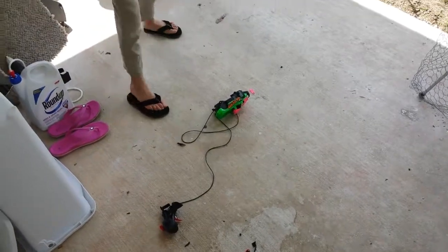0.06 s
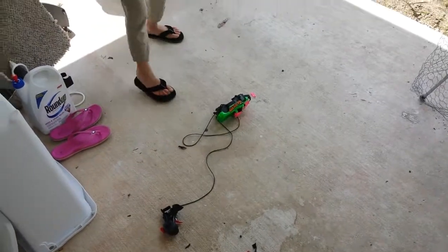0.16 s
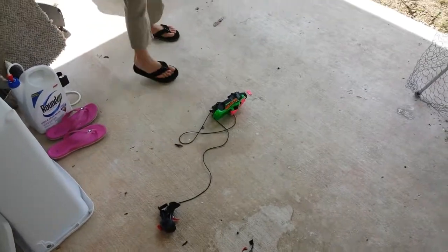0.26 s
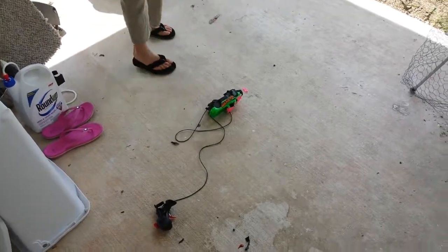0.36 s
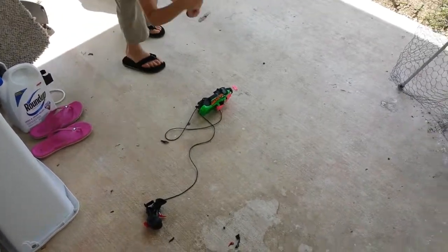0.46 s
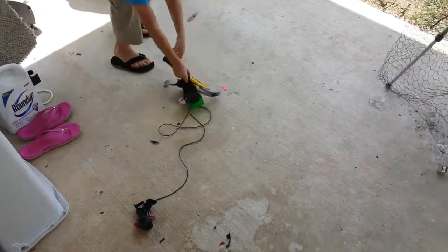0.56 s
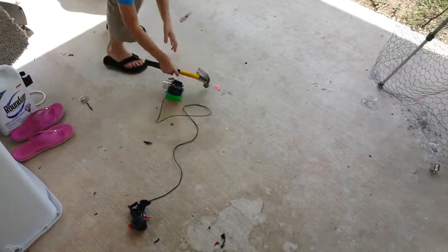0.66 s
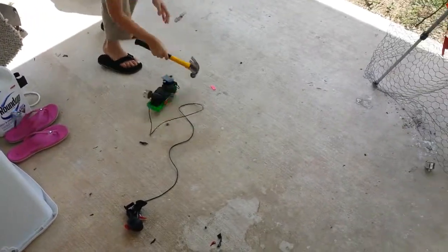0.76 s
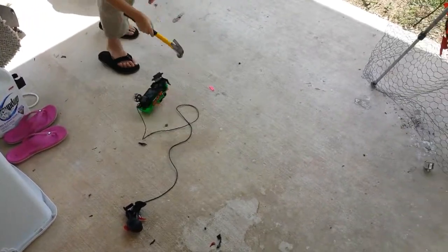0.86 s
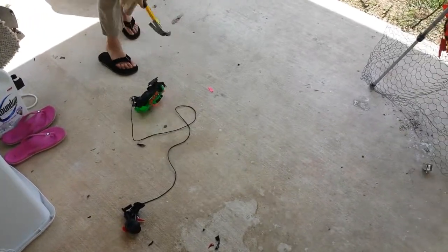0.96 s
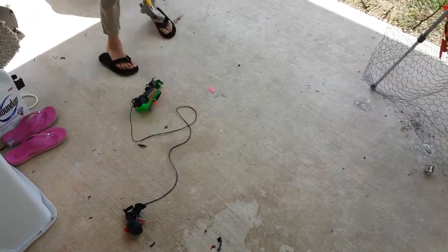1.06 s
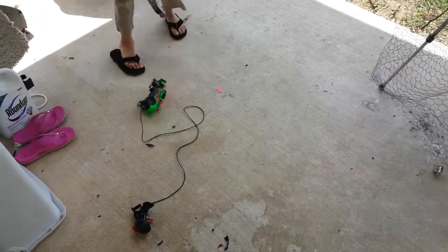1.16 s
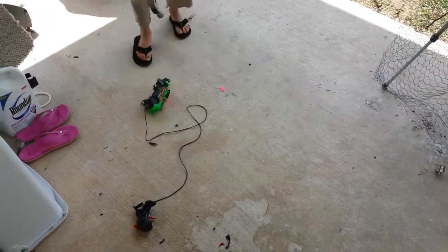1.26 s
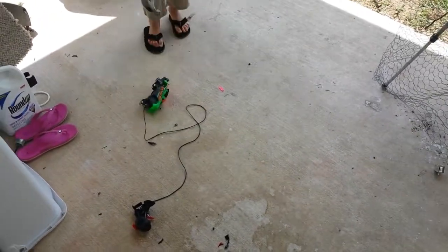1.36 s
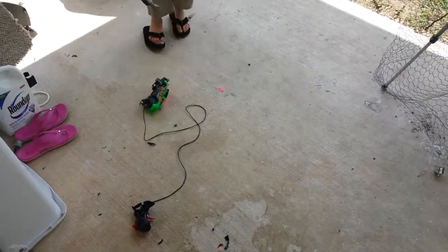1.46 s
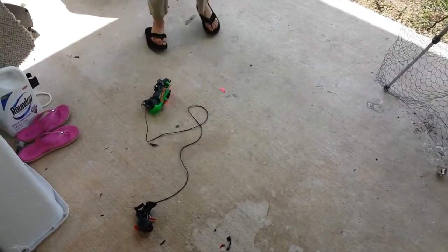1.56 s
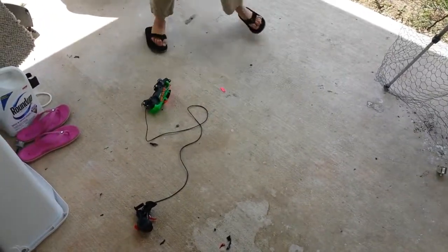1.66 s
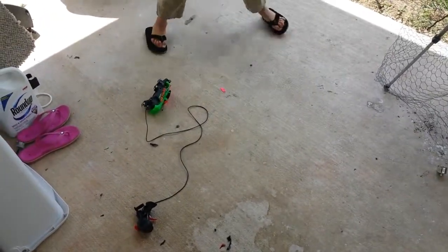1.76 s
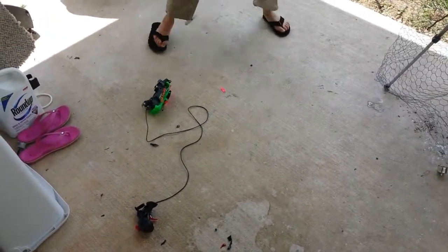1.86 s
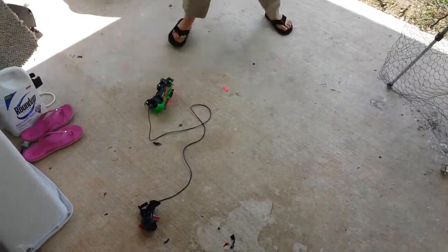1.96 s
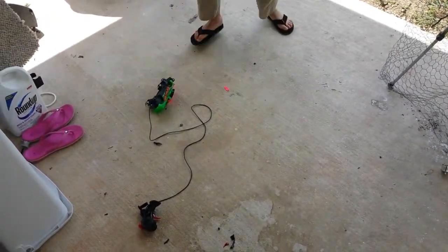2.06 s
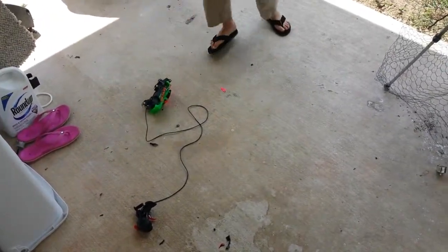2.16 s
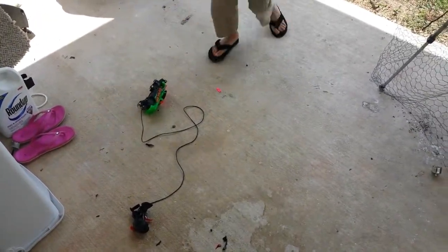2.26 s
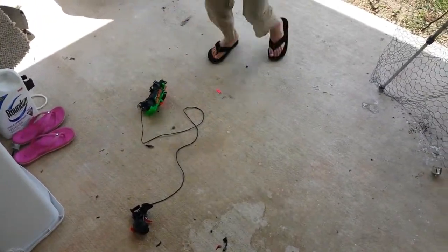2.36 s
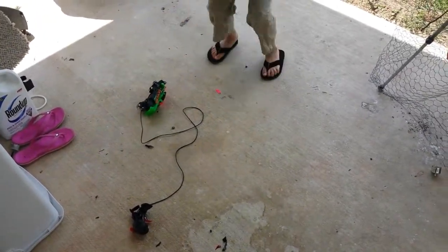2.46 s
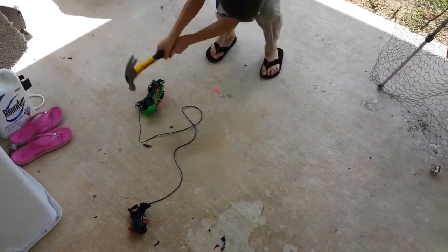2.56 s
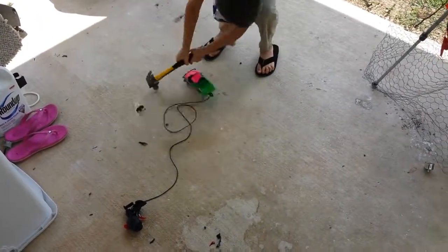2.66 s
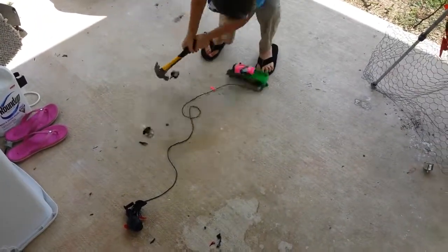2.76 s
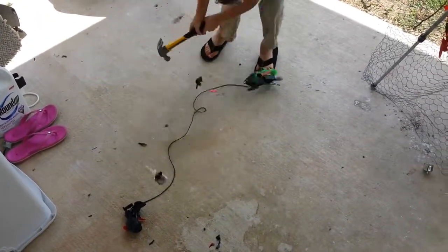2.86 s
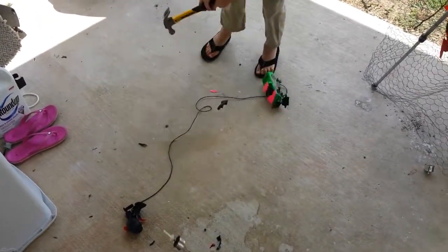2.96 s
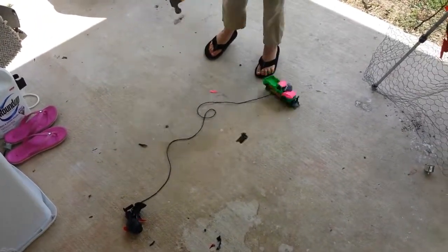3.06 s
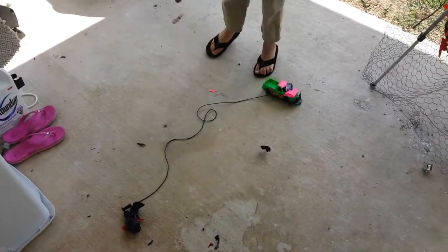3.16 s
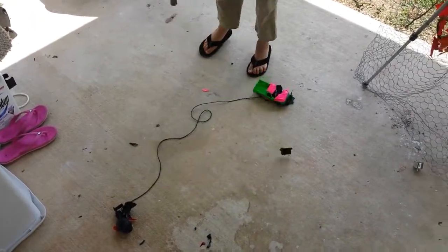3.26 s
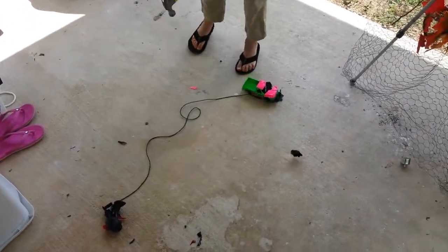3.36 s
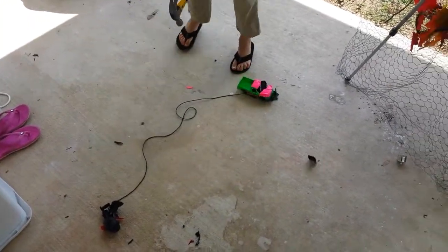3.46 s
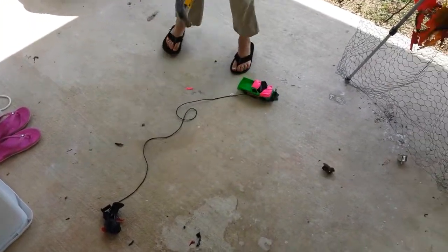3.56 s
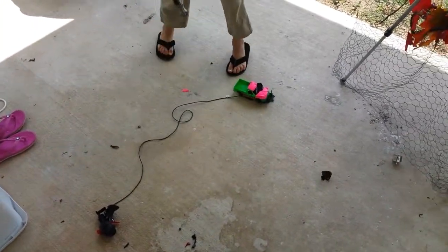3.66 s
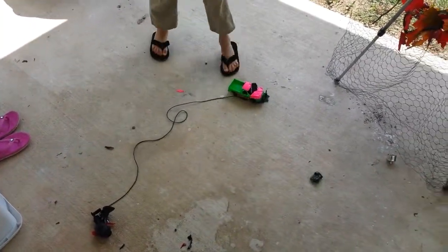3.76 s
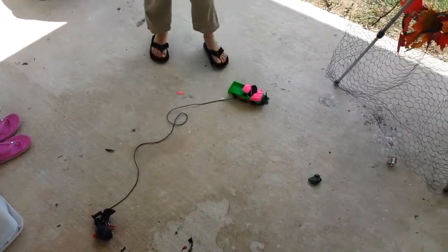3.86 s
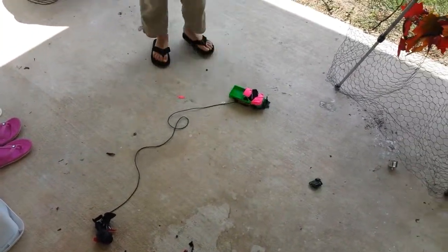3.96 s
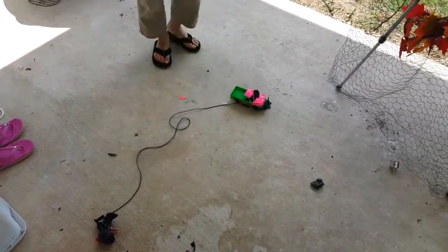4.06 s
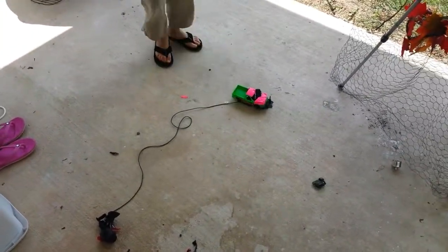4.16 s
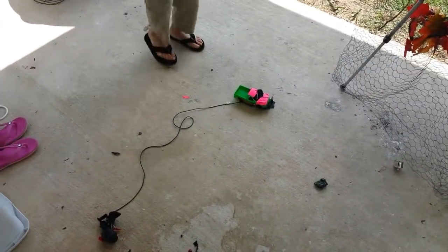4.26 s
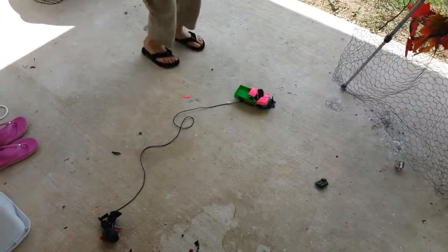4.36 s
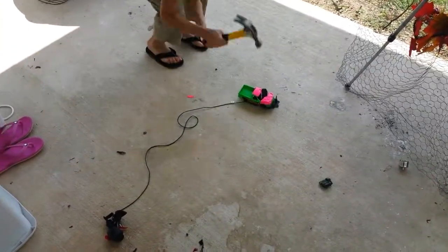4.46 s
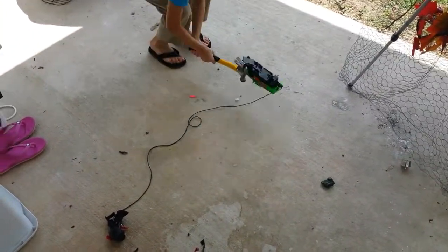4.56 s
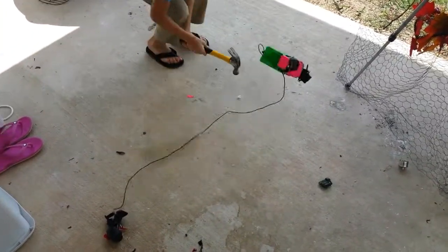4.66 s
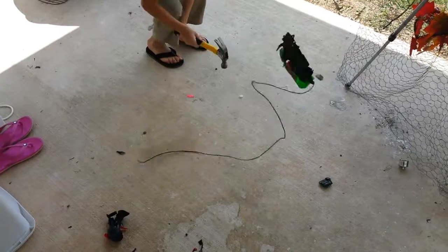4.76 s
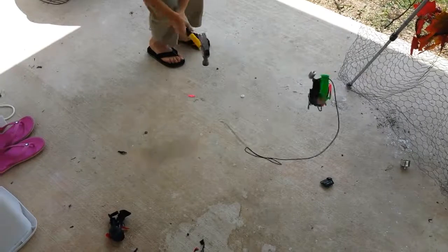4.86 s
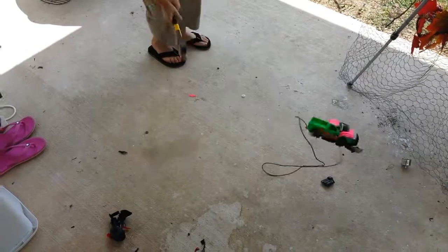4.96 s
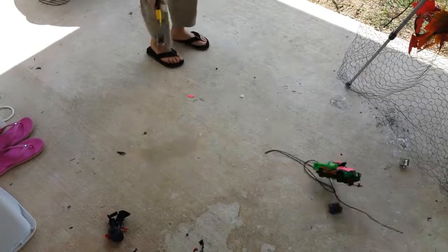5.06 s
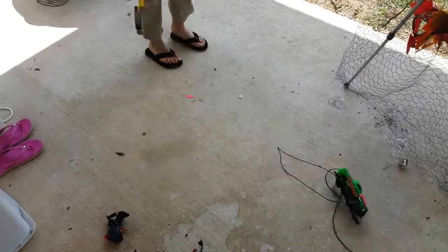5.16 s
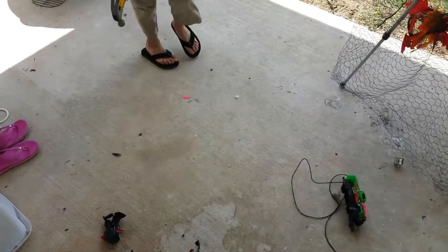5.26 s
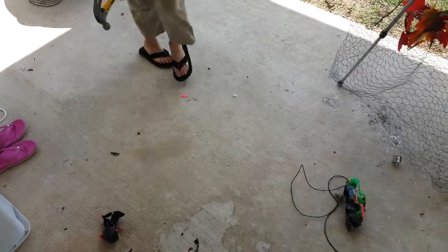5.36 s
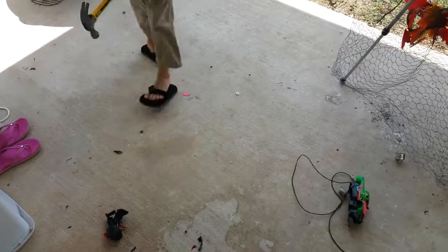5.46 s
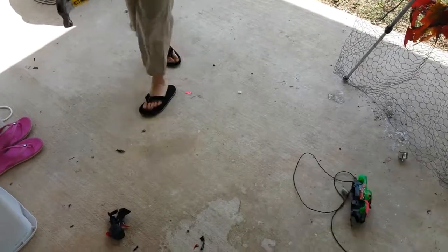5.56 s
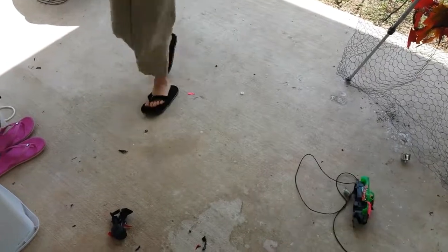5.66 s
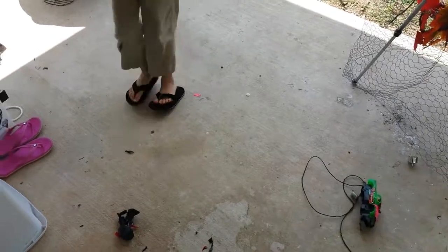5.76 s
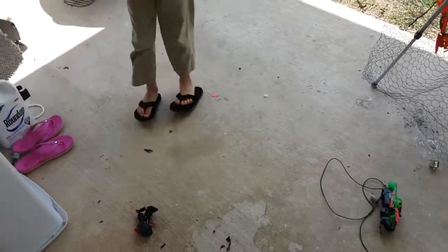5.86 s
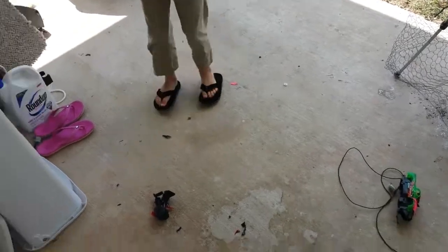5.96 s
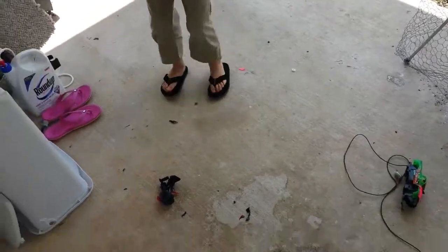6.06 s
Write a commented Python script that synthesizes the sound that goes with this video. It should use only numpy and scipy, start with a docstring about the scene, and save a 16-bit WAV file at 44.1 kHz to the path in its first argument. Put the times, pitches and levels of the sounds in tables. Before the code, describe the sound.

Heard in stereo from a few metres away: three very loud, sharp hammer hits on brittle plastic over concrete, about two seconds apart, each with splintering snaps and short, bright patio reflections. The first two thump the slab; the third is mostly crack. Plastic clatter, tiny bouncing pieces and sandal scrapes fill the gaps. The background dips after each blow, then recovers. A faint distant whistle and wind rumble appear.

```python
"""On a covered patio with outdoor hiss, a faint hum and a breeze at the microphone, sandals scuff the concrete.
A claw hammer then smashes a plastic toy truck: shaped bursts of snaps excite the shell and the slab.
The truck tumbles, a chip ricochets, bits bounce and loose parts ping; a faint far whistle follows.
A second and a third blow scatter more debris between scuffs; near the end hard gusts thump the microphone
and the whistle returns. A limiter ducks the loud peaks, holds and recovers."""
import sys
import numpy as np
from scipy import signal
from scipy.fft import rfft, irfft, next_fast_len
from scipy.io import wavfile
from scipy.ndimage import uniform_filter1d, minimum_filter1d

SR = 44100
rng = np.random.default_rng(int(sys.argv[2]) if len(sys.argv) > 2 else 0)


def unload_wav(signal):
    """Save mono or channel-first audio to the path in sys.argv[1] as 16-bit WAV at rate SR, clipped to [-1, 1]."""
    wavfile.write(
        sys.argv[1],
        SR,
        np.round(np.clip(np.atleast_2d(signal).T, -1, 1) * 32767).astype(np.int16),
    )


N = 268877
SIZE = 20480  # samples in one event with its tail
T = np.arange(SIZE) / SR
HZ = np.fft.rfftfreq(SIZE, 1 / SR)
TIME = np.arange(N) / SR


def amp(db):
    """Logarithmic level: decibels to amplitude gain."""
    return 10 ** (np.asarray(db) / 20)


def unit(x):
    """Energy normalization: scales to a mean energy of one per channel."""
    return x / np.sqrt(np.mean(np.sum(x ** 2, -1)) + 1e-20)


def steady(x):
    """Power normalization: scales to an rms of one."""
    return x / np.sqrt(np.mean(x ** 2) + 1e-20)


def read(points, hz):
    """Logarithmic frequency scale: interpolates a table along log frequency."""
    table_hz, value = np.transpose(points)
    return np.interp(np.log(hz + 1), np.log(table_hz + 1), value)


def add(mix, s, db, sound):
    """Superposition: mixes in an event whose energy equals 20 ms at the level db."""
    part = mix[:, max(round(s * SR), 0):][:, :SIZE]
    part += amp(db) * np.sqrt(SR / 50) * unit(sound)[:, :part.shape[1]]


def colour(x, db):
    """Minimum-phase filtering: folds the cepstrum so that the gain db over HZ acts causally."""
    fold = np.r_[1, np.full(SIZE // 2 - 1, 2), 1, np.zeros(SIZE // 2 - 1)]
    cepstrum = irfft(np.log(amp(db) + 1e-5))
    response = np.exp(rfft(cepstrum * fold))
    return irfft(rfft(x) * response)


def bell(centre_hz, depth_db):
    """Broad resonance: an emphasis depth_db down an octave from its centre, with straight skirts."""
    octaves = np.log2((HZ + 20) / centre_hz)
    return -depth_db * (np.hypot(1, octaves) - 1) / (np.sqrt(2) - 1)


def ring(modes, spread=0.):
    """Modal superposition: decaying sines, which each contact excites a little differently."""
    hz, db, t60 = np.transpose(modes)[:, :, None]
    size, detune, start = rng.standard_normal((3, len(modes), 1))
    polarity_phase = np.pi * (start > 0)
    waves = np.sin(2 * np.pi * hz * (1 + spread * detune) * T + polarity_phase)
    decay = np.exp(-np.log(1000) * T / np.abs(t60))
    return unit((amp(db + 0.38 * size) * decay * waves).sum(0))


def convolve(a, b):
    """Linear superposition of responses: convolution, cut to one event's length."""
    return signal.fftconvolve(np.atleast_2d(a), np.atleast_2d(b), axes=1)[:, :SIZE]


# likeness of diffuse sound at the left and right ports: (frequency [Hz], correlation [1])
ALIKE = [(100, 1), (600, 0.69), (1300, 0.043), (3000, 0.061), (12000, 0.081)]


def pair(z, hz):
    """Diffuse-field coherence: mixes two unrelated spectra until they are alike as at the two ports."""
    angle = np.arcsin(np.clip(read(ALIKE, hz), -1, 1)) / 2
    return np.cos(angle) * z + np.sin(angle) * z[::-1]


# reverberation of the patio: (frequency [Hz], t60 [s])
PATIO = [(150, .27), (500, 0.23), (1500, 0.26), (4000, 0.22), (7000, 0.21), (12000, .16)]


def patio(x, wet_db, build_s=0.0011, early_s=0.025, early_db=3.0):
    """Room impulse response: direct sound, strong early reflections off walls and roof, a weaker tail."""
    reflected = rng.random(SIZE) < .03 + 1.5 * T  # reflections grow denser
    taps = rng.standard_normal((2, SIZE)) * reflected
    hz, t, z = signal.stft(taps, SR, nperseg=256)
    z = pair(z, hz[:, None]) * amp(-60 * t / read(PATIO, hz)[:, None])
    tail = signal.istft(z, SR, nperseg=256)[1][:, :SIZE] * (1 - np.exp(-T / build_s))
    tail *= amp(early_db / (1 + (T / early_s) ** 8))
    response = amp(wet_db) * unit(tail)
    response[[0, 1], [0, 3]] += 1  # direct sound, three samples later at the right port
    return convolve(x, response)


def crunch(length_s, snaps_per_s=6000):
    """Impulsive excitation: a contact bites within a millisecond, then showers dying small snaps."""
    snaps = rng.standard_normal(SIZE) * (rng.random(SIZE) < snaps_per_s / SR)
    bite = 1 - np.exp(-T / .0008)
    return unit(snaps * bite * np.exp(-T / max(length_s, .001)))


def struck(modes, length_s, ring_db, uneven_db):
    """Source and resonator: a crunch shakes a part's modes; each contact has its own peaks and dips."""
    body = amp(ring_db) * ring(modes, spread=0.0053)
    body[0] += 1  # the crunch itself
    knots = np.arange(0, SR / 2, 260)
    contact_db = np.interp(HZ, knots, uneven_db * rng.standard_normal(len(knots)))
    return colour(convolve(crunch(length_s), body), contact_db)


def drift(per_s):
    """Random modulation: slow chance movement with an rms of one and per_s knots a second."""
    knots = np.arange(0, TIME[-1] + 1, 1 / per_s)
    return steady(np.interp(TIME, knots, rng.standard_normal(4096)[:len(knots)]))


def noise(spectrum, diffuse):
    """Spectral shaping: two channels of noise, as a diffuse field or as turbulence at each port."""
    size = next_fast_len(N, real=True)
    hz = np.fft.rfftfreq(size, 1 / SR)
    z = rfft(rng.standard_normal((2, size)))
    z = pair(z, hz) if diffuse else z + 0.18 * z[::-1]
    return steady(irfft(z * amp(read(spectrum, hz)), size)[:, :N])


# spectrum of the outdoor hiss: (frequency [Hz], relative density [dB per Hz])
AIR = [(59, -26), (100, -5), (167, -7), (201, -12), (232, -4), (336, -7), (364, -6.5), (747, -9.5),
       (1410, -14.5), (2090, -14), (2960, -18.5), (3560, -18), (6060, -16.5), (12400, -37.5), (13500, -50)]
# partials of the machine's hum, about which pitch and level waver: (frequency [Hz], level [dB])
HUM = [(113, -48), (166.5, -46), (242, -55.5), (339, -58.5), (500, -58)]


def outdoors(air_db=-39):
    """Diffuse field and wavering tones: distant hiss with the hum of a machine."""
    out = amp(air_db + 0.17 * drift(3.46)) * noise(AIR, True)
    for hz, db in HUM:
        level = amp(db + 1.6 * drift(7)) * np.sqrt(2)
        phase = 2 * np.pi * np.cumsum(hz + 2.465 * drift(14)) / SR
        out += level * np.sin(phase)
    return out


# faint far whistle: (time of its middle [s], level [dB], mean frequency [Hz], length [s])
WHISTLES = [(1.866, -36, 2177, 0.35), (5.927, -44, 2210, .18)]


def whistles():
    """Frequency-modulated tone: a thin, unsteady note swells and fades, smeared by reverberation."""
    out = np.zeros((2, N))
    for s, db, hz, length in WHISTLES:
        swell = np.sin(np.pi * np.minimum(T / length, 1))
        phase = 2 * np.pi * np.cumsum(hz + 70 * drift(89)[:SIZE]) / SR
        add(out, s - length / 2, db, patio(swell * np.sin(phase), wet_db=3))
    return out


# strength of the breeze, about which it flutters: (time [s], level [dB])
BREEZE = [(0, -41.5), (.25, -32), (.6, -37.5), (1, -46.5), (1.6, -40), (2.5, -42.5), (3.45, -45.5),
          (3.7, -33.5), (4.15, -32), (4.38, -38.5), (4.6, -28.5), (4.95, -35), (5.25, -31.5), (5.45, -34.5),
          (6.1, -24.5)]
# single gusts that thump the microphone: (time of the peak [s], strength [dB])
GUSTS = [(5.64, -18), (5.79, -24.5), (5.91, -22.5), (5.97, -17)]
GUST_S = .018  # standard deviation of a gust's bell-shaped envelope
# spectrum of the rumble: (frequency [Hz], relative density [dB per Hz])
BUFFET = [(15, -34), (35, -7.5), (60, 3.5), (105, -0.5), (170, -5), (300, -18.5), (600, -29.5), (1500, -68),
          (6000, -55.5)]
# spectrum of the eddies in hard gusts: (frequency [Hz], relative density [dB per Hz])
EDDIES = [(25, -31), (70, -3.5), (130, 2), (220, -3), (400, -11.5), (700, -20), (1300, -52), (4000, -75)]


def wind(hard_db=-27):
    """Turbulent pressure: a breeze rumbles; hard gusts add smaller, higher eddies, mostly on the left."""
    gusts = sum(amp(db) * np.exp(-((TIME - s) / GUST_S) ** 2 / 2) for s, db in GUSTS)
    breeze = amp(np.interp(TIME, *np.transpose(BREEZE)) + 1.96 * drift(35))
    force_db = 20 * np.log10(np.hypot(breeze, gusts))
    rumble = amp(np.minimum(force_db, hard_db)) * noise(BUFFET, False)
    eddy_db = force_db + np.minimum(force_db - hard_db - 9.5, 0)  # weaker wind makes far fewer eddies
    eddies = amp(eddy_db) * noise(EDDIES, False)
    return rumble * amp([[.6], [-3]]) + eddies * amp([[1.5], [-6]])  # gains of left, right


# sandals on concrete: (time of the peak [s], level [dB], centre [Hz], rise [s], fall [s])
STEPS = [(.01, -27, 4500, 0.031, 0.13), (.254, -30.5, 4930, 0.0014, 0.01),
         (1.17, -28.5, 4900, 0.031, 0.026), (1.43, -27.5, 5000, .04, 0.08),
         (1.54, -27.5, 5200, .015, 0.011), (1.952, -25, 1240, 0.0013, 0.0072),
         (2.58, -14.5, 4360, .026, 0.0073), (3.76, -30, 3150, 0.026, 0.013),
         (4.24, -30.5, 1120, 0.016, 0.032)]
# spectrum of soles on grit: (frequency [Hz], relative density [dB per Hz])
GRIT = [(80, -12.5), (300, 5), (600, 0.5), (1200, -4.5), (2500, -4.5), (6000, -1), (9000, -5), (13000, -16)]


def sandals():
    """Granular friction: the pressure of a sole scales the random impulses of grit as it slaps or drags."""
    out = np.zeros((2, N))
    for s, db, hz, rise, fall in STEPS:
        lead = min(3 * rise, s)  # seconds from the first touch to the peak
        press = np.exp(-((T - lead) / rise) ** 2 / 2)
        release = np.exp(-np.abs(T - lead) / fall)
        pressure = np.where(T < lead, press, release)
        grains = rng.standard_normal(SIZE) * amp(5.4 * rng.standard_normal(SIZE)) * pressure
        scrape = colour(grains, read(GRIT, HZ) + bell(hz, depth_db=3.0))
        add(out, s - lead, db, patio(scrape, wet_db=-1.0))
    return out


# flicked loose parts: (time [s], level [dB], frequency [Hz], t60 [s])
PINGS = [(0.982, -27, 2000, 0.027), (3.501, -32, 3720, 0.017), (4.528, -36, 5810, 0.026),
         (4.897, -29.5, 3230, 0.032)]


def pings():
    """Impulse response of a resonator: a flicked loose part rings at one pitch with a faint octave."""
    out = np.zeros((2, N))
    for s, db, hz, t60 in PINGS:
        tone = ring([(hz, 0, t60), (2 * hz, -8, t60 / 2)])
        add(out, s, db, patio(convolve(crunch(0.00081), tone), wet_db=-2.5))
    return out


# flying chip striking something hollow: (time [s], click level [dB], hollow ring level [dB])
RICOCHET = [(0.934, -12.5, -36), (.943, -16.5, -19), (0.961, -31, -18.5)]
# modes of the chip: (frequency [Hz], relative level [dB], t60 [s])
CHIP = [(4240, -6, 0.064), (5860, -18, 0.073), (7485, 10, 0.031), (7900, -1.5, 0.073), (8650, -21, .08),
        (11200, -7, .08), (11300, -2, .1)]
# modes of the hollow thing once settled: (frequency [Hz], relative level [dB], t60 [s])
HOLLOW = [(294, -7.5, 0.025), (400, -4.5, 0.081), (824, -17.5, 0.044)]
# spectrum of a small hard contact: (frequency [Hz], relative density [dB per Hz])
TICK = [(500, 8), (2000, 2), (9000, 1), (11500, -6.5), (13500, -16)]


def ricochet(bend=0.11, settle_s=0.0092):
    """Pitch glide: a chip clicks on a hollow thing, whose note rises as its dented wall springs back."""
    out = np.zeros((2, N))
    for s, click_db, hollow_db in RICOCHET:
        click = colour(struck(CHIP, .003, ring_db=-4, uneven_db=5.0), read(TICK, HZ) + bell(6700, depth_db=5.5))
        add(out, s, click_db, patio(click, wet_db=0))
        bent_time = T - bend * settle_s * (1 - np.exp(-T / settle_s))
        note = np.interp(bent_time, T, ring(HOLLOW))
        add(out, s, hollow_db, patio(note, wet_db=-13.5))
    return out


RESTITUTION = .522  # each flight of a bit lasts this share of the one before
# first rebound against the landing, and each later one against the last [dB]
BIT_REBOUND_DB, BIT_FADE_DB = -10, -1


def bounces(s, flight_s, count):
    """Restitution: ever quicker, weaker rebounds, as rows (time [s], level against the landing [dB])."""
    k = np.arange(count)
    times = s + np.cumsum(flight_s * RESTITUTION ** k)
    return [(s, 0), *zip(times, BIT_REBOUND_DB + BIT_FADE_DB * k)]


# bits landing on concrete: (time [s], level [dB], centre [Hz], time to the first rebound [s])
BITS = [(1.219, -27, 7000, 0.019), (3.197, -21, 3900, 0.021), (3.411, -18.5, 6140, 0.0092),
        (3.64, -23.5, 6500, 0.021), (3.661, -22, 5500, .142), (4.073, -33.5, 8000, 0.066),
        (4.529, -31, 6500, 0.061)]
# modes of a loose bit: (frequency [Hz], relative level [dB], t60 [s])
BIT = [(2960, 0, 0.046), (5400, 3, 0.047), (5750, 12, 0.093), (6530, -28, .15), (7000, 1, 0.106),
       (7870, 3, 0.033), (9270, -5.5, 0.032), (10100, -9, 0.046), (10390, -3, 0.051)]


def bits():
    """Repeated inelastic impact: small hard pieces tick brightly, ring briefly and skip to rest."""
    out = np.zeros((2, N))
    for start, db, hz, flight in BITS:
        for s, loss_db in bounces(start, flight, count=3):
            tick = struck(BIT, 0.0014, ring_db=-11, uneven_db=5)
            tick = colour(tick, read(TICK, HZ) + bell(hz, depth_db=6.5))
            add(out, s, db + loss_db, patio(tick, wet_db=-3.5))
    return out


# the truck's landings: (time [s], level [dB], centre [Hz], length of the clatter [s], time to the rebound [s])
LANDINGS = [(.745, -5, 5170, .011, 0.025), (1.056, -27, 4300, 0.024, 0.011),
            (1.272, -20, 5700, 0.0083, .016), (2.856, -8.5, 4900, 0.0073, 0.011),
            (2.932, -16, 3220, 0.011, 0.028), (3.13, -26.5, 2020, .018, 0.043),
            (3.167, -22, 3640, 0.015, 0.028), (3.28, -15, 3600, 0.0028, .012),
            (3.943, -25, 3120, 0.0029, 0.08), (4.783, -17, 2380, .006, .012),
            (5.207, -5.5, 4560, 0.0024, 0.011), (5.306, -12, 4470, 0.007, .018),
            (5.345, -16, 3780, 0.0042, .01), (5.473, -27.5, 4360, .003, 0.065),
            (5.569, -23, 3770, 0.0037, 0.089)]
GRAZE_S, GRAZE_DB = 0.0065, -13  # a corner grazes the slab this long before the landing, at this relative level
TRUCK_REBOUND_DB = -4.5  # rebound against the landing
# modes of the truck's shell: (frequency [Hz], relative level [dB], t60 [s])
SHELL = [(1460, 5, 0.078), (1941, -5, 0.25), (2263, -0.5, 0.04), (2593, 2.5, 0.18), (2650, 1.5, 0.1),
         (3236, 7, 0.089), (3747, -5.5, 0.044), (3947, 6, 0.034), (4645, 5.5, 0.065), (4780, -14, 0.049),
         (5450, -5, .1), (5420, -1, 0.07), (6800, -10, 0.04), (6360, -0.5, 0.17), (6570, -15, .12)]
# spectrum of the cracking shell: (frequency [Hz], relative density [dB per Hz])
CRACK = [(100, -25), (400, -8), (900, -6), (1400, -2), (2200, -0.5), (3200, -4), (4500, -2), (6200, 0.5),
         (8000, -1), (11000, -9), (13000, -21.5)]


def truck(dulling=0.94):
    """Successive impacts: the truck grazes, lands and rocks onto another corner, each contact duller."""
    out = np.zeros((2, N))
    for start, db, hz, length, flight in LANDINGS:
        contacts = [(-GRAZE_S, GRAZE_DB), (0, 0), (flight, TRUCK_REBOUND_DB)]
        for k, (late_s, loss_db) in enumerate(contacts):
            centre_hz = hz * dulling ** (k - 1)  # the table's centre belongs to the landing
            clack = struck(SHELL, length, ring_db=-17.0, uneven_db=2.5)
            clack = colour(clack, read(CRACK, HZ) + bell(centre_hz, depth_db=4.0))
            add(out, start + late_s, db + loss_db, patio(clack, wet_db=1.0))
    return out


# hammer on the shell: (time [s], level [dB], centre [Hz], length of the crunch [s])
BLOWS = [(0.7022, 0.5, 3400, 0.0078), (0.7102, 5.5, 2350, 0.0032), (2.7524, 5, 5630, 0.0038),
         (2.7608, 4, 2340, 0.0014), (4.67, 9.5, 4470, 0.0033)]
SPLINTER_DB, SPLINTER_S, SPLINTERS_PER_S = -12.5, 0.038, 260  # level against the blow, decay, rate of snaps


def splinters():
    """Random impulse process: after each blow the cracked shell sheds a thinning spray of sharp snaps."""
    out = np.zeros((2, N))
    for s, db, hz, _ in BLOWS:
        snaps = colour(crunch(SPLINTER_S, SPLINTERS_PER_S), read(CRACK, HZ) + bell(hz, depth_db=2.5))
        add(out, s, db + SPLINTER_DB, patio(snaps, wet_db=-4))
    return out


# hammer driving through to the slab: (time [s], level [dB], centre [Hz])
THUDS = [(0.71, 1.5, 480), (2.7613, -0.5, 170), (4.671, -20.5, 450)]
# spectrum of the push on the slab: (frequency [Hz], relative density [dB per Hz])
THUMP = [(50, -15.5), (110, -14), (150, 7.5), (220, 0), (450, -6.5), (900, -5.5), (1800, -2), (4000, -38.5),
         (10000, -31)]
# low modes of the patio: (frequency [Hz], relative level [dB], t60 [s])
BOOM = [(156.6, 9, 0.16), (209.4, -3, 0.19), (373, -6.5, 0.29), (524, -12.5, 0.39), (548, -3.5, 0.24),
        (579, -13.5, 0.51), (737, -6, 0.34), (848, -4, 0.33)]


def hammer():
    """Impact and modal response: the head crushes the shell, thuds on the slab and sets the patio booming."""
    out = np.zeros((2, N))
    for s, db, hz, length in BLOWS:
        crack = struck(SHELL, length, ring_db=-11.5, uneven_db=2.5)
        crack = colour(crack, read(CRACK, HZ) + bell(hz, depth_db=2.0))
        add(out, s, db, patio(crack, wet_db=0.5))
    for s, db, hz in THUDS:
        push = patio(colour(crunch(0.0025), read(THUMP, HZ)), wet_db=-2.0)
        boom = ring(BOOM) * (1 - np.exp(-T / 0.006))
        add(out, s, db, colour(unit(push) + amp(-0.5) * boom, bell(hz, depth_db=1.0)))
    return out


# contrast between the microphone ports: (frequency [Hz], left minus right [dB])
PORTS = [(800, -.5), (1200, 3), (2800, 1.5), (3500, 3), (4600, 2), (5300, 1.5), (5900, 8.5), (6600, 1.5),
         (8000, -7), (12000, -5.5)]


def scene():
    """Superposition and port resonance: all sources, heard through two ports that resonate differently."""
    background = outdoors() + whistles() + wind()
    debris = sandals() + pings() + ricochet() + bits() + truck()
    mix = background + debris + splinters() + hammer()
    click = signal.unit_impulse(SIZE)
    ports = [colour(click, side * read(PORTS, HZ) / 2)[:512] for side in (1, -1)]
    return signal.oaconvolve(mix, np.array(ports), axes=1)[:, :N]


EDGE_HZ = 13200  # upper band limit


def record(dry, threshold_db=-9, depth_db=12.5, hold_s=0.95, recover_db_per_s=24, attack_s=0.000434):
    """Dynamic range limiting: ducks fast, holds, recovers; overshoots are clipped, then the band limited."""
    power_db = 10 * np.log10(np.abs(uniform_filter1d((dry ** 2).mean(0), size=64)) + 1e-12)
    over_db = np.clip(power_db - threshold_db, 0, depth_db)
    half = int(hold_s * SR / 2)
    held_db = -minimum_filter1d(-over_db, 2 * half + 1, origin=half, mode="constant")
    ramp = TIME * recover_db_per_s
    duck_db = np.maximum.accumulate(held_db + ramp) - ramp  # falls no faster than the ramp
    keep = np.exp(-1 / (attack_s * SR))
    ducked = dry / amp(signal.lfilter([1 - keep], [1, -keep], duck_db))
    clipped = ducked / (1 + (ducked / .88) ** 8) ** (1 / 8)
    band_limit = signal.firwin(255, EDGE_HZ, window=("kaiser", 7), fs=SR)
    return signal.oaconvolve(clipped, band_limit[None], "same")


dry = scene()
out = record(dry)
unload_wav(out)
```